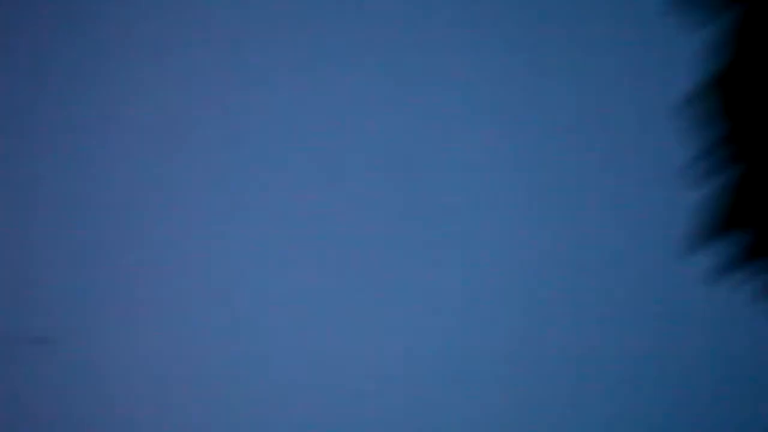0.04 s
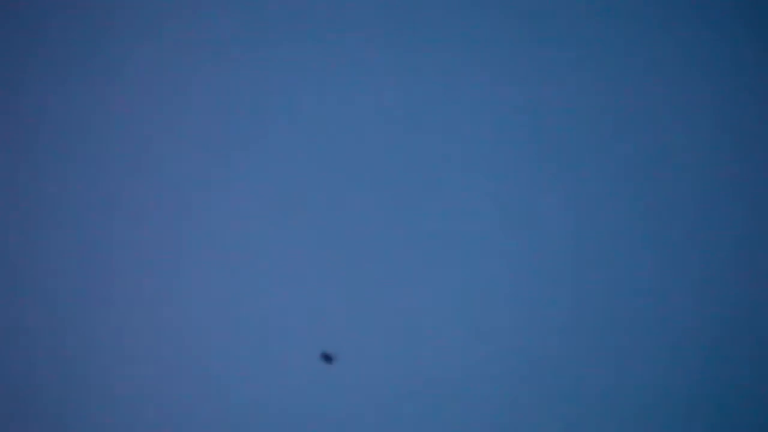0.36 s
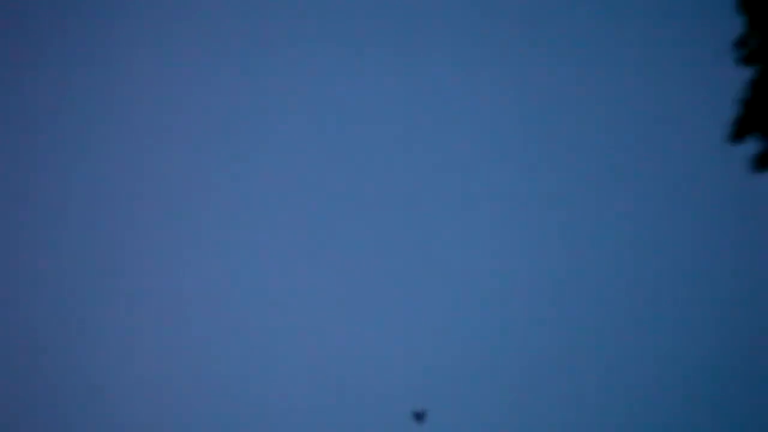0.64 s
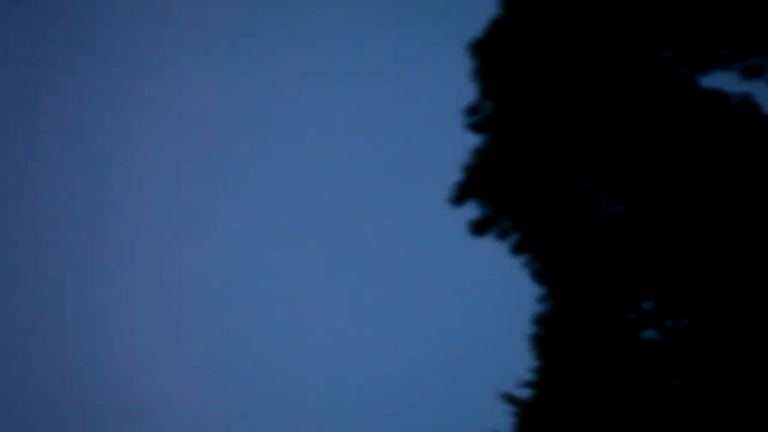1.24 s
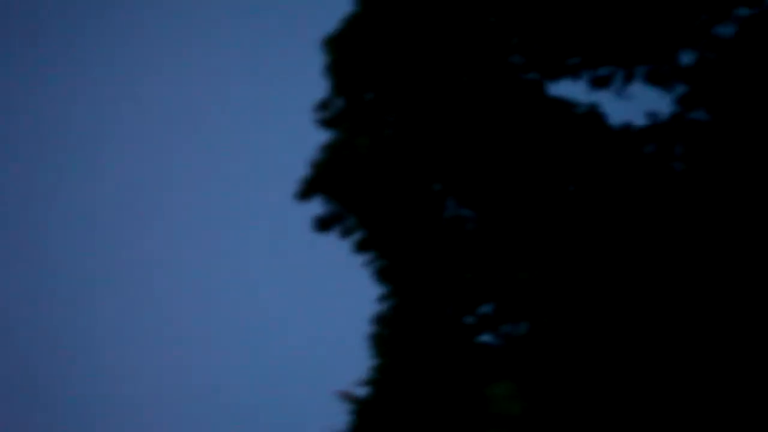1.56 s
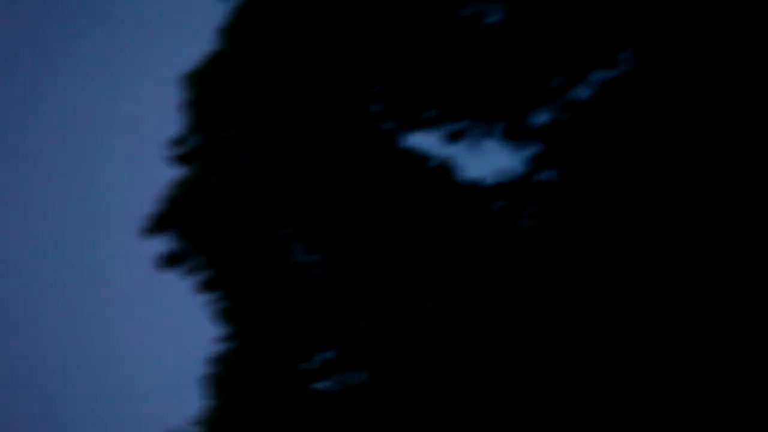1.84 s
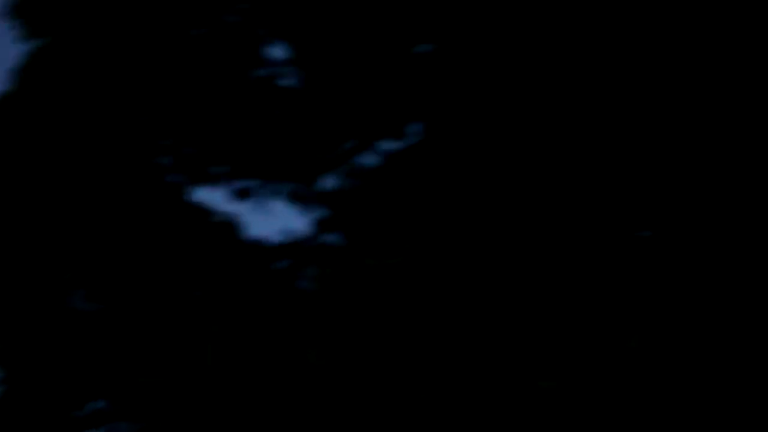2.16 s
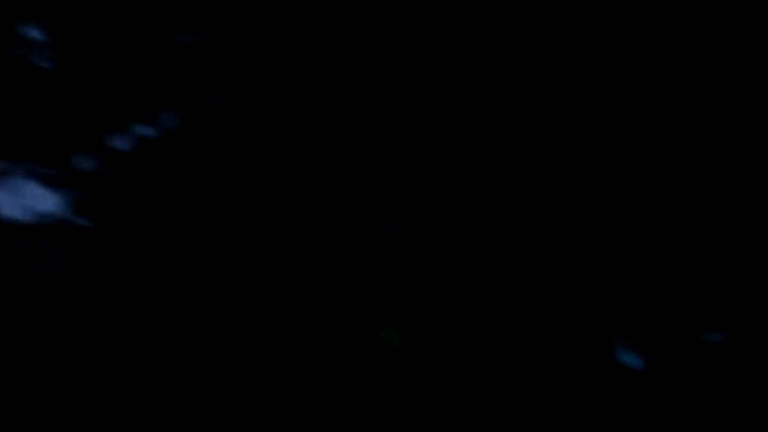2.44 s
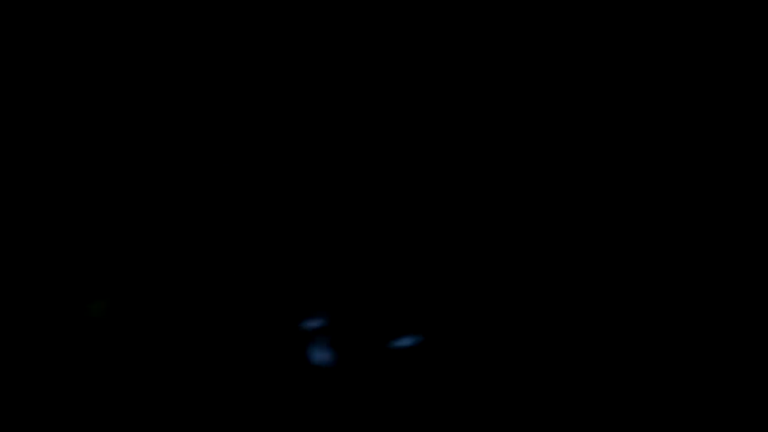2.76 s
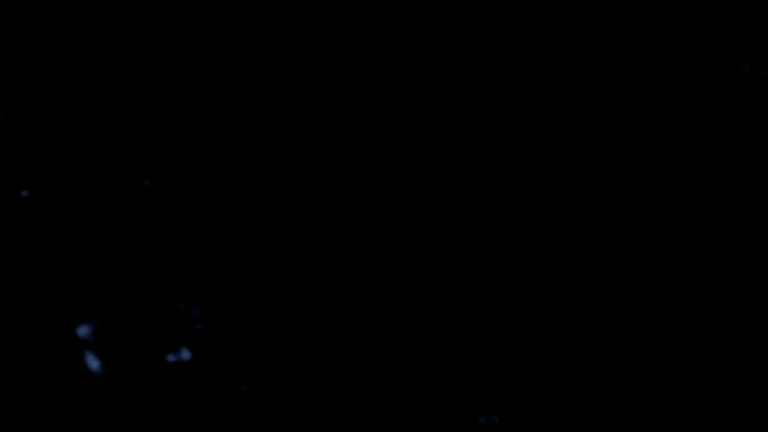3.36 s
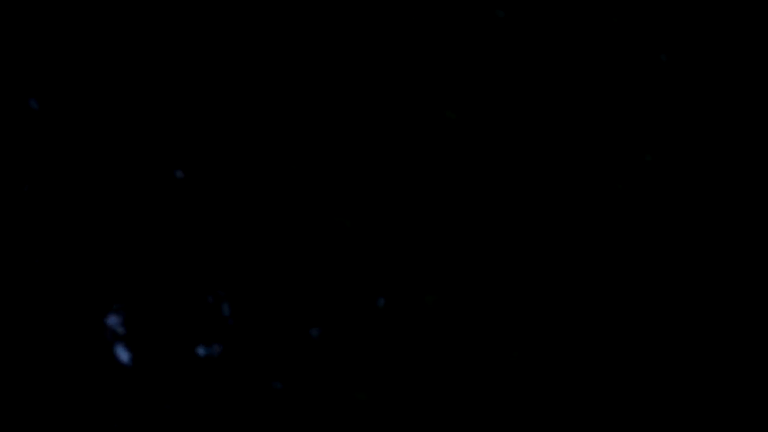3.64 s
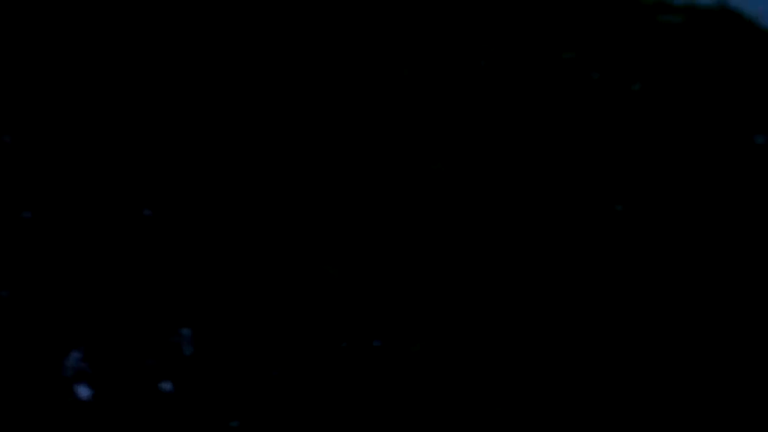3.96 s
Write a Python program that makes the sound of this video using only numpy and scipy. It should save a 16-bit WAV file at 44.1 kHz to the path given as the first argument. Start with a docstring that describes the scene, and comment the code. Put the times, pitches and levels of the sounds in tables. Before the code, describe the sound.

Quick, sharp clicks of a bat heard through a detector, with hiss growing louder.

```python
"""Bat detector at dusk

A bat hunts along a row of trees; the microphone is close to a heterodyne detector's small loudspeaker.
Each call sweeps down past the detector's tuning, so its beat note shoots up from zero: a click of a few
ms. Foliage scatters the calls, most of all on the second pass. The detector's hiss grows steadily louder."""
import sys
import numpy as np
from scipy import signal
from scipy.fft import rfft, irfft, next_fast_len
from scipy.io import wavfile

SR = 44100
rng = np.random.default_rng(int(sys.argv[2]) if len(sys.argv) > 2 else 0)


def dump(signal):
    """Clip the signal to [-1, 1] and save it as 16-bit WAV at the path in sys.argv[1]."""
    limited = np.clip(np.atleast_2d(signal).T, -1, 1)
    pcm = np.round(limited * 32767).astype(np.int16)
    wavfile.write(sys.argv[1], SR, pcm)


N = 176400
LEAD_S = 0.0009  # a call starts this long before zero beat


def amp(db):
    """Decibels to gain."""
    return 10 ** (np.asarray(db) / 20)


def unit_rms(x):
    """Scale to rms 1."""
    return x / np.sqrt(np.mean(x ** 2) + 1e-20)


def ramp(u):
    """A smooth step from 0 to 1."""
    return np.sin(np.pi / 2 * np.clip(u, 0, 1)) ** 2


def filtered(x, response):
    """Filter x by a gain given as a function of frequency."""
    size = next_fast_len(N + SR // 2)
    hz = np.fft.rfftfreq(size, 1 / SR)
    return irfft(rfft(x, size) * response(hz), size)[..., :N]


def coloured(x, curve):
    """Equalise x by a curve of (frequency [Hz], gain [dB]) on a log frequency axis."""
    curve_hz, curve_db = np.transpose(curve)
    return filtered(x, lambda hz: amp(np.interp(np.log(hz + 1), np.log(curve_hz + 1), curve_db)))


def detector_hiss():
    """The detector's smooth noise, swelling and slowly changing colour."""
    # swell of the hiss (time [s], level [dB])
    swell = [(0.0, -41.5), (1.37, -37.5), (2.51, -32.5), (3.11, -30), (3.88, -27), (4.0, -26)]
    # its three successive spectra (frequency [Hz], relative level [dB])
    early = [(15, -57), (25, -29.5), (352, -9.5), (527, -4.5), (672, -4), (2030, -2), (2330, -3),
             (2520, -1), (5230, -4), (6850, -6), (15800, -19)]
    middle = [(15, -63), (25, -38), (184, -13.5), (449, -5), (691, -3), (905, -3), (1060, -1.5), (1470, -2),
              (1730, -0.5), (2590, -2), (4450, -1.5), (6660, -5), (13400, -15.5), (15800, -22)]
    late = [(15, -67), (25, -39.5), (211, -11), (361, -8), (542, -3.5), (604, -4.5), (710, -3),
            (1590, -1.5), (2150, -1.5), (2460, -0.5), (5230, -2.5), (8970, -8.5), (14600, -18.5),
            (15800, -21)]
    # when each spectrum is heard alone (time [s])
    colour_times = [0.27, 1.77, 3.6]
    t = np.arange(N) / SR
    noises = [unit_rms(coloured(rng.standard_normal(N), curve)) for curve in (early, middle, late)]
    power_shares = [np.interp(t, colour_times, row) for row in np.eye(3)]
    blend = sum(np.sqrt(share) * noise for share, noise in zip(power_shares, noises))
    return amp(np.interp(t, *np.transpose(swell))) * blend


def beat_note(top_hz, length, foot_db, phase):
    """A call mixed with the detector's tuning: the pitch passes zero, levels off, then hooks back down."""
    sweep_s, hook_s, hook_hz = 0.000862, 0.00046, 1290  # two time constants; depth of the hook
    attack_s, release_s = 0.0018, 0.0014
    t = np.arange(int((LEAD_S + length) * SR)) / SR - LEAD_S
    climb = np.maximum(1 - np.exp(-t / sweep_s), -1)
    hz = top_hz * climb - hook_hz * np.exp((t - length) / hook_s)
    envelope = ramp((t + LEAD_S) / attack_s) * ramp((length - t) / release_s)
    tilt = amp(foot_db * (1 - np.maximum(climb, 0)))
    return envelope * tilt * np.sin(2 * np.pi * np.cumsum(hz) / SR + phase)


def foliage_echo(when, top_hz, length, foot_db):
    """A call, Doppler-shifted and scattered by close leaves and far trees, with the call's own energy."""
    # foliage along the flight (time [s], 60 dB decay of close leaves [s], far trees over leaves [dB],
    # build-up of the echo [s], Doppler drop of the beat note [Hz])
    foliage = [(.2, 0.034, 3, 0.0045, 420), (1.1, 0.04, -4, 0.0028, 250), (2.0, 0.079, -7, 0.0017, 40),
               (2.6, 0.051, -13, 0.0012, 0)]
    far_t60 = 0.1  # s
    times, *columns = np.transpose(foliage)
    close_t60, far_db, rise_s, doppler_hz = [np.interp(when, times, column) for column in columns]
    call = beat_note(top_hz - doppler_hz, length, foot_db, phase=0)
    t = np.arange(SR // 5) / SR
    close_leaves = amp(-60 * t / close_t60)
    far_trees = amp(far_db - 60 * t / far_t60)
    scatter = rng.standard_normal(len(t)) * np.hypot(close_leaves, far_trees) * ramp(t / rise_s)
    echo = signal.fftconvolve(call, scatter)
    return echo * np.linalg.norm(call) / np.linalg.norm(echo)


def bat():
    """Every call and its echo off the trees, played by the detector's small loudspeaker."""
    # calls ahead of the loudspeaker (time of zero beat [s], pitch the beat climbs towards [Hz],
    # length after zero beat [s], direct gain [dB], echo gain [dB], foot of the sweep over its top [dB])
    calls = [ (.0075, 5850, 0.0043, -14.5, -22.5, -5), (0.1833, 5946, 0.0043, -7, -21, 1),
             (.2808, 5720, 0.0035, -14.5, -23, -6), (.4528, 5430, .0045, -8, -21.5, 0),
             (.5495, 5450, 0.0047, -12, -23, -2), (.7262, 5450, 0.0036, -6, -22, -2.5),
             (0.822, 5640, 0.0038, -14, -24, -4.5), (0.9167, 5150, 0.0038, -14, -28, 3.5),
             (1.012, 5300, 0.0038, -14.5, -28, -3.5), (1.1017, 4970, 0.0041, -15, -26.5, 4.5),
             (1.2014, 5200, 0.0041, -26, -29, -7), (1.293, 4950, 0.0039, -26.5, -26, 4),
             (1.392, 4500, 0.0047, -35, -30.5, -1), (1.405, 2370, 0.0029, -25, -41, 7.5),
             (1.4855, 4250, 0.0045, -32, -28, -2), (1.582, 5070, 0.0036, -35, -32, 0),
             (1.6765, 4800, 0.0041, -32, -28, -3), (1.779, 4700, 0.004, -38, -30.5, 0),
             (1.8780, 4800, 0.0041, -34, -26.5, -2), (1.962, 5750, 0.0035, -19.5, -15.5, 2),
             (2.063, 5200, 0.0042, -29, -23.5, 2), (2.1595, 4980, 0.0038, -25, -19, -1),
             (2.2440, 5220, 0.0035, -17.5, -13.5, 2.5), (2.3193, 5400, 0.0044, -13, -12.5, 0),
             (2.3793, 4780, 0.0034, -34, -14, 3.5), (2.4497, 5090, 0.0032, -16, -14, 5),
             (2.5128, 4360, 0.003, -19.5, -21.5, 9), (2.5732, 3910, 0.0028, -12.5, -22, -2.5),
             (2.6205, 2500, 0.0021, -29, -24, 6), (2.672, 3040, 0.003, -25, -22, -1),
             (2.704, 3170, .0020, -31, -30, -2)]
    # response of the loudspeaker (frequency [Hz], gain [dB])
    loudspeaker = [(30, -31), (100, -23), (300, -7.5), (1000, -3), (2500, -0.5), (4500, 1.5), (6000, -1),
                   (9000, -5)]
    clicks = np.zeros(N + SR)
    for when, top_hz, length, direct_db, echo_db, foot_db in calls:
        call = beat_note(top_hz, length, foot_db, phase=rng.uniform(0, 2 * np.pi))
        echo = foliage_echo(when, top_hz, length, foot_db)
        start = max(0, round((when - LEAD_S) * SR))
        clicks[start:][:len(call)] += amp(direct_db) * call
        clicks[start:][:len(echo)] += amp(echo_db) * echo
    return coloured(clicks[:N], loudspeaker)


def scene():
    """One small loudspeaker close to the microphone: both channels carry the same sound."""
    detector = bat() + detector_hiss()
    return np.array([detector, detector])


def record(dry):
    """The recorder keeps nothing above its band limit."""
    band_limit_hz = 15850
    return filtered(dry, lambda hz: hz < band_limit_hz)


dry = scene()
out = record(dry)
dump(out)
```